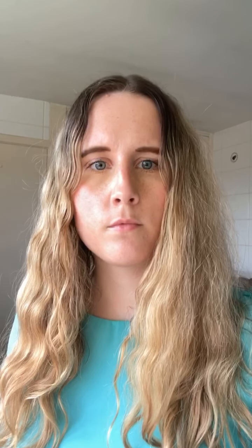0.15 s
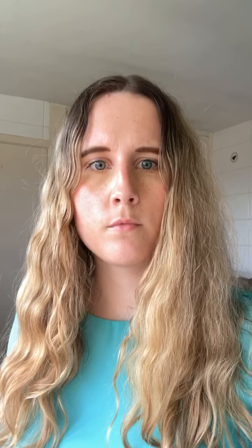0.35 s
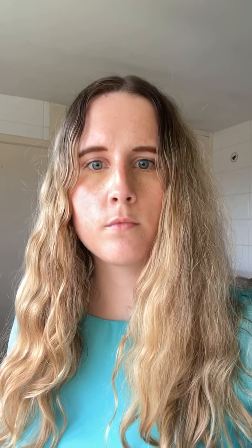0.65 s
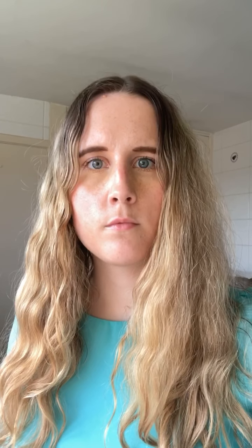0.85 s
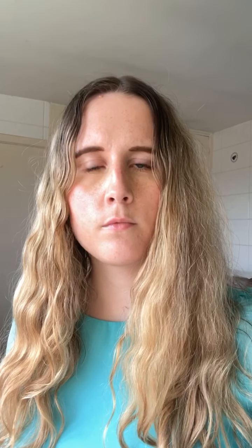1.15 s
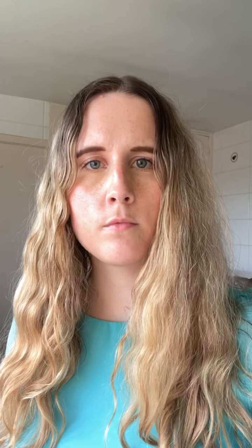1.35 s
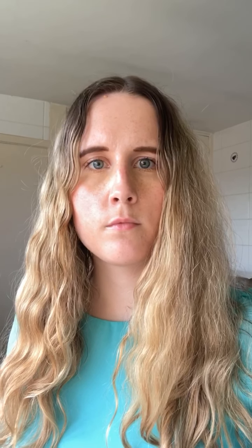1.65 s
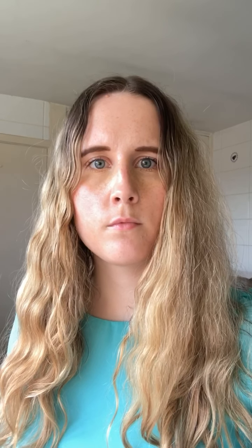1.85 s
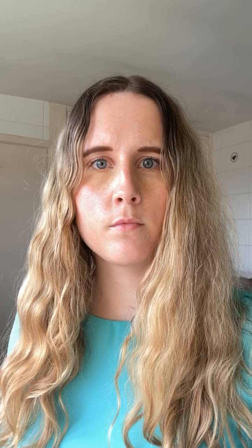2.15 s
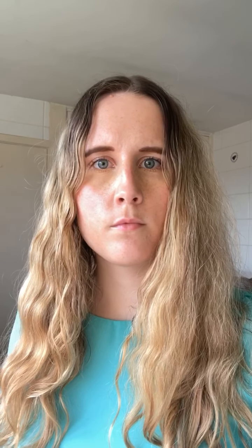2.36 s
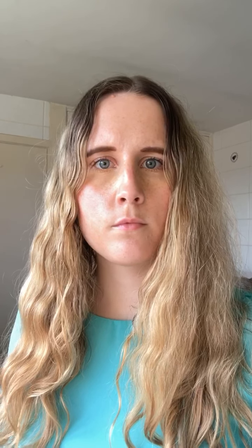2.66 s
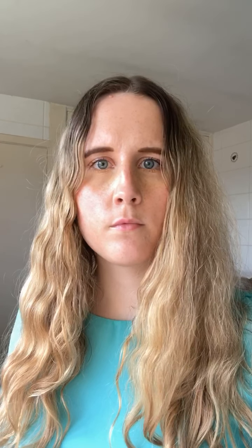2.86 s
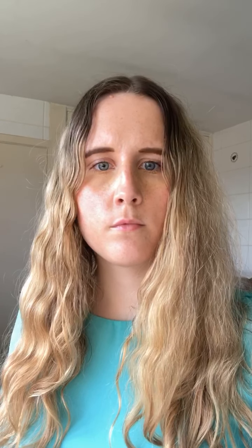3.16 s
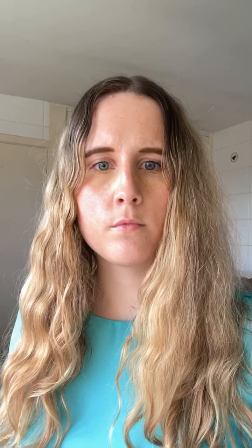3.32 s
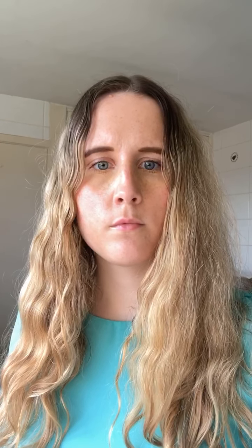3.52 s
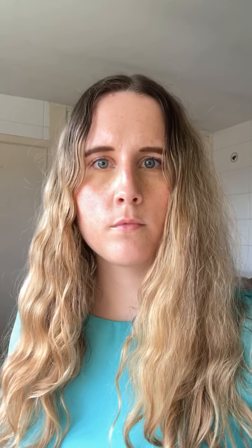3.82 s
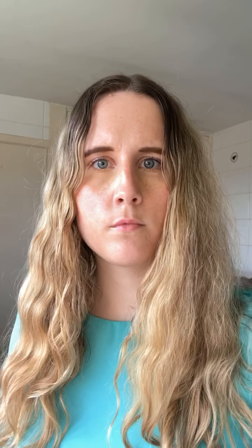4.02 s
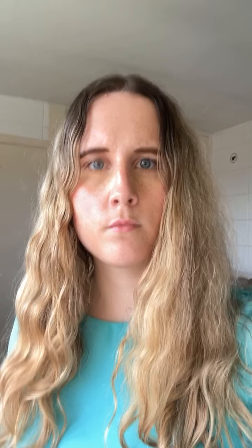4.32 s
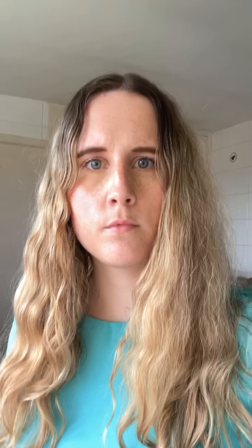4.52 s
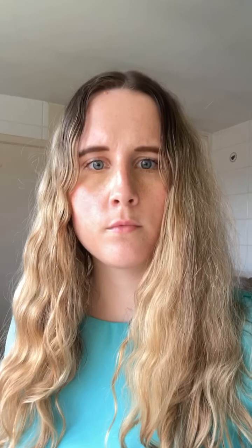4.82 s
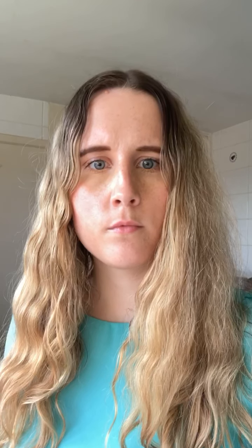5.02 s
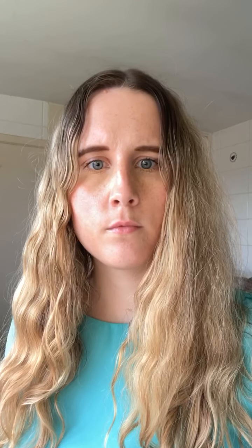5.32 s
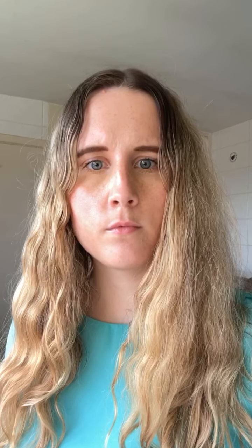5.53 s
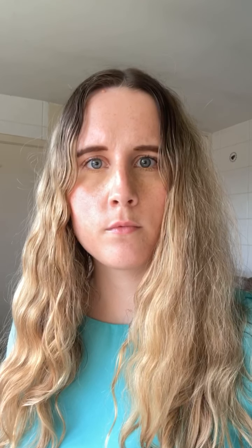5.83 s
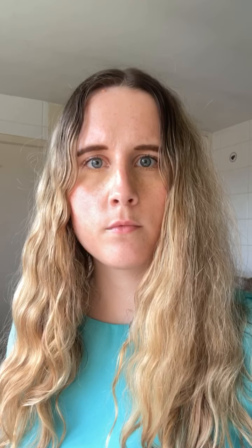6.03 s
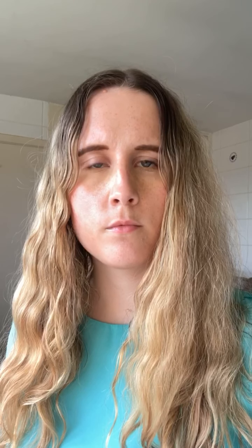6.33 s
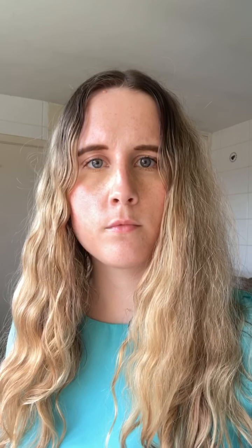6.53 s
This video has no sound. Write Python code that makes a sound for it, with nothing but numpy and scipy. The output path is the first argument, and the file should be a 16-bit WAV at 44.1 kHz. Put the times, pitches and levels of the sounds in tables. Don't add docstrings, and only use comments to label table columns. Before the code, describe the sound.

Crisp, bright fingertip ticks on a hand-held phone screen, irregularly spaced, with tiny skin clicks between and a faint low motor hum behind.

```python
import sys
import numpy as np
from scipy import signal
from scipy.fft import rfft, irfft
from scipy.io import wavfile

SR = 44100
rng = np.random.default_rng(int(sys.argv[2]) if len(sys.argv) > 2 else 0)


def transcribe(signal):
    frames = np.atleast_2d(signal).T
    limited = np.clip(frames, -1, 1)
    pcm = np.round(limited * 32767).astype(np.int16)
    wavfile.write(sys.argv[1], SR, pcm)


def volts_from_db(level):
    exponent = np.asarray(level, float) / 20
    return 10 ** exponent


N = 294581


def evened(x):
    return x / np.sqrt(np.mean(x ** 2) + 1e-20)


def add(mix, start_s, sound):
    part = mix[round(start_s * SR):][:len(sound)]
    part += sound[:len(part)]


def mode(hz, t60, rise=0., late=0.):
    t = np.maximum(np.arange(4096) / SR - late, 0)
    swell = (1 - np.exp(-t / (rise + 1e-6))) ** 2
    ring = np.sin(2 * np.pi * hz * t) * volts_from_db(-60 * t / t60) * swell
    return ring / abs(ring).max()


def coloured(x, hz, db):
    bins = np.fft.rfftfreq(len(x), 1 / SR)
    gain = volts_from_db(np.interp(np.log(bins + 1), np.log(hz), db))
    return irfft(rfft(x) * gain, len(x))


# (f/Hz, level/dB per Hz)
FLOOR_COLOUR = [(25, -42.5), (45, -20.5), (160, -12.5), (400, -15.5), (2090, -33.5), (7900, -36.5),
                (8300, -33.5), (15500, -37.5)]
# (f/Hz, width/Hz, level/dB, steady core relative to its drift)
MOTOR_LINES = [(62, 30, -79.5, 1.3), (98.4, 5.2, -73, 1.8), (134.8, 11, -71.5, -0.5),
               (153.2, 14, -62.5, 1.5), (198.77, 9.5, -75, 0.13), (307.2, 2.7, -71, 2.5)]


def room_tone():
    hiss = coloured(rng.standard_normal(N), *np.transpose(FLOOR_COLOUR))
    out = volts_from_db(-65.5) * evened(hiss)
    t = np.arange(N) / SR
    for hz, width_hz, db, core in MOTOR_LINES:
        pole = np.exp(-np.pi * width_hz / SR)
        noise = rng.standard_normal(N) + 1j * rng.standard_normal(N)
        drift = signal.lfilter([1], np.poly([pole, pole]), noise)
        steady = core * np.sqrt(np.mean(abs(drift) ** 2))
        line = ((drift + steady) * np.exp(2j * np.pi * hz * t)).real
        out += volts_from_db(db) * evened(line)
    return out


# (t/s, tick energy level/dB, case knock level/dB, deep knock level/dB, room answer level/dB)
TAPS = [
    (.4168, 4, -21.5, -55, -26),
    (.7426, 5.5, -31, -60.5, -29),
    (1.6613, 4.5, -24, -42.5, -26.5),
    (2.4531, 4.5, -25, -41.5, -28.5),
    (3.3014, -6, -37.5, -60.5, -43),
    (3.9999, 5.5, -38.5, -41, -33.5),
    (5.1202, 3.5, -26, -61, -31),
    (5.6100, 4, -30, -53, -31.5),
    (5.7598, 2, -33, -50.5, -33),
]
# (spot, stretch of its frequencies when hit a little off, ghost level/dB)
SPOTS = [("edge", 0.99, -37), ("corner", 0.99, -41), ("middle", 0.96, -34), ("middle", 1, -43.5),
         ("soft", 0.98, -60), ("top", 0.98, -37.5), ("low", 1, -56.5), ("rim", 1.019, -44.5),
         ("rim", 0.96, -47)]
GLASS_COLOUR = { "edge": [(700, -4), (1400, -6), (2500, -23), (3700, -6.5), (5900, 2.5), (9200, 2.5),
                (13000, 0), (15200, -6.5)], "corner": [(700, -26.5), (1600, -11), (2900, -17), (4300, -6.5),
                (7000, -1), (9000, 2.5), (13800, -5), (15200, -9.5)], "rim": [(700, -24), (1600, -12),
                (2600, -9), (4500, -2), (6800, 0.5), (8000, 3), (12800, -2), (15200, -6)],
                "middle": [(700, -18.5), (1400, -7), (4000, -11), (6000, -1), (8000, -.5), (8900, -5),
                (12800, -11), (15200, -13.5)], "soft": [(700, -13), (1400, -8.5), (2300, -22.5), (3700, -3),
                (6000, -1.5), (8000, -4), (12200, -12), (15200, -21.5)], "top": [(700, -25), (1700, -7.5),
                (4200, -11), (6000, 0), (8000, 0.5), (9500, 3), (12500, -9), (15200, -12.5)],
                "low": [(1300, -26), (2650, -10), (4500, -13), (4950, -3), (6200, -0.5), (8300, -6.5),
                (11600, -2.5), (15200, -17.5)], }
EDGE_NOTCHES = { "edge": [(2660, 310, 0.3), (4610, 450, 1), (5300, 330, 0.9), (7500, 450, 0.7),
                (10860, 1400, 0.54)], "corner": [(1189, 360, .84), (2108, 300, .4), (3590, 220, 1),
                (5700, 960, .88), (10300, 1900, .9)], "rim": [(1180, 230, 0.74), (3060, 280, .68),
                (3730, 200, .93), (5960, 610, .96), (10100, 1700, 0.85)], "middle": [(1020, 76, .9),
                (2130, 300, 0.9), (3000, 800, .7), (11893, 500, .6), (13900, 500, .8)],
                "soft": [(1134, 280, 0.88), (4760, 660, 0.27)], "top": [(1382, 230, .81), (2200, 350, .9),
                (3110, 200, 1), (4000, 180, .6)], "low": [(1130, 200, .7), (3620, 320, .5),
                (10800, 1140, .9), (12900, 1100, 0.91), (14500, 640, .7)], }
# (t/s from the tick, level/dB)
GHOSTS = [(-.0214, 0), (-.0107, -11), (.0214, -3)]


def glass_tick(spot, stretch):
    hz = np.fft.rfftfreq(4096, 1 / SR)
    points_hz, points_db = np.transpose([(100, -89)] + GLASS_COLOUR[spot])
    gain = volts_from_db(np.interp(np.log(hz + 1), np.log(points_hz * stretch), points_db))
    for notch_hz, width_hz, depth in EDGE_NOTCHES[spot]:
        offset = 2 * (hz - notch_hz * stretch) / width_hz
        gain *= 1 - min(depth, .99) / np.sqrt(1 + offset ** 2)
    both_sides = np.r_[gain, gain[-2:0:-1]]
    causal = -signal.hilbert(np.log(both_sides)).imag[:len(hz)]
    spread = 2 * np.pi * (.052 * np.sqrt(hz) + .001 * hz)
    return irfft(gain * np.exp(1j * (causal - spread)))


def ticks():
    out = np.zeros(N)
    for (s, db, *_), (spot, stretch, ghost_db) in zip(TAPS, SPOTS):
        tick = glass_tick(spot, stretch)
        start = s - abs(tick).argmax() / SR
        tick = tick / np.linalg.norm(tick)
        add(out, start, volts_from_db(db) * tick)
        thin = coloured(tick, [2500, 5000], [-30, 0])
        for offset_s, offset_db in GHOSTS:
            add(out, start + offset_s, volts_from_db(ghost_db + offset_db) * thin)
    return out


def bob():
    return mode(70, .055, rise=.02, late=.0065)


CASE_HZ = {"edge": 699, "corner": 761, "rim": 740, "middle": 740, "soft": 737, "top": 692, "low": 715}
# (f/Hz, t60/s)
CASE_T60 = [(670, 0.0084), (715, .01), (735, 0.0056)]


def knocks():
    out = np.zeros(N)
    deep = mode(290, 0.02, 0.0017, 0.0016) + .6 * mode(150, .04, 0.0033, 0.0026)
    for (s, _, db, deep_db, _), (spot, *_) in zip(TAPS, SPOTS):
        hz = CASE_HZ[spot]
        t60 = np.interp(hz, *np.transpose(CASE_T60))
        knock = -volts_from_db(db) * mode(hz, t60, rise=.0012, late=.0004)
        bob_db = -51 + .2 * (deep_db + 51)
        add(out, s, knock + volts_from_db(deep_db) * deep + volts_from_db(bob_db) * bob())
    return out


# (f/Hz, t60/s, level/dB)
ROOM = [(500, 0.4, -5.5), (1300, 0.18, -4.5), (3500, 0.33, -4), (7500, 0.34, -4.5), (9000, .38, -1),
        (15200, .24, 0.5), (15896, .2, -30)]


def walls():
    out = np.zeros(N)
    hz, t60, db = np.transpose(ROOM)
    for s, *_, room_db in TAPS:
        echoes = rng.standard_normal(SR // 2)
        bins, t, z = signal.stft(echoes, SR, nperseg=128)
        band_t60 = np.interp(bins, hz, t60)[:, None]
        band_db = np.interp(bins, hz, db)[:, None]
        tail = signal.istft(z * volts_from_db(band_db - 60 * t / band_t60), SR, nperseg=128)[1]
        early = 1 + .3 * np.exp(-np.arange(len(tail)) / SR / .006)
        add(out, s + .001, volts_from_db(room_db - 17) * early * tail)
    return out


# (t/s, crackle peak level/dB, low pop level/dB, hand bob level/dB)
LIFTS = [
    (3.2967, -54, -51.5, -77.5),
    (3.3554, -51, -54, -69),
    (4.1299, -68, -42.5, -55),
    (4.163, -52, -53.5, -68.5),
    (5.2898, -47, -51, -68),
    (5.301, -46, -46, -54),
    (5.367, -54, -56, -67.5),
]


def lifts():
    out = np.zeros(N)
    fade = volts_from_db(-60 * np.arange(4096) / SR / 0.0038)
    pop = mode(680, 0.005466, 0.0002015) + 0.52 * mode(194, 0.02047, 0.0027, 0.0032)
    for s, db, pop_db, bob_db in LIFTS:
        grit = rng.standard_normal(4096)
        crackle = fade * coloured(grit, [800, 2500, 7000, 12000], [0.5, 8, 7, -23.5])
        add(out, s, volts_from_db(db) * crackle + volts_from_db(pop_db) * pop + volts_from_db(bob_db) * bob())
    return out


# (t/s, level/dB, case ring f/Hz)
SLIPS = [
    (4.1665, -43, 740),
    (4.1692, -42.5, 720),
    (4.1712, -39, 388),
    (4.1733, -56, 801),
    (4.1754, -33, 700),
    (4.1769, -42.5, 700),
    (4.1783, -39.5, 647),
    (4.1811, -34.5, 375),
]
# (t/s, level/dB)
RASP = [
    (4.158, -55),
    (4.168, -51),
    (4.175, -37.5),
    (4.179, -51.5),
    (4.187, -56),
]
# (t/s, level/dB)
SLIDE_BOB = (4.1705, -41.5)


def slide():
    out = np.zeros(N)
    for slip_s, slip_db, hz in SLIPS:
        add(out, slip_s, volts_from_db(slip_db) * mode(hz, 4.1 / hz, rise=0.073 / hz))
    s, db = np.transpose(RASP)
    t = np.arange(s[0], s[-1], 1 / SR)
    rasp = coloured(rng.standard_normal(len(t)), [300, 1300, 2400, 2850, 3300, 4500, 16000],
                    [-2.5, -4, -8, 3.5, -14, -13.5, -8.5])
    add(out, s[0], volts_from_db(np.interp(t, s, db)) * rasp)
    bob_s, bob_db = SLIDE_BOB
    add(out, bob_s, volts_from_db(bob_db) * bob())
    return out


def scene():
    return (room_tone() + ticks() + knocks() + walls() + lifts() + slide())[None]


def top_cut(x):
    return signal.sosfilt(signal.butter(12, 16820, fs=SR, output="sos"), x)


def record(dry):
    hz = np.fft.rfftfreq(N, 1 / SR)
    step_hz, step_db, step_width_hz = 8130, -6.5, 25
    step = volts_from_db(step_db * .5 * np.tanh((hz - step_hz) / step_width_hz))
    band = np.interp(hz, [30, 50, 15200, 15900, 16400, 16800], volts_from_db([-20, 0, 0, -25, -16, -52]))
    mix = irfft(rfft(dry) * step * band, N)
    return top_cut(mix)


dry = scene()
out = record(dry)
transcribe(out)
```